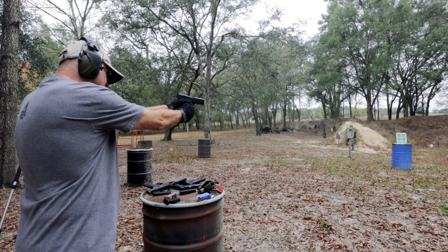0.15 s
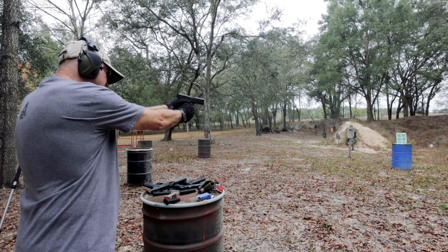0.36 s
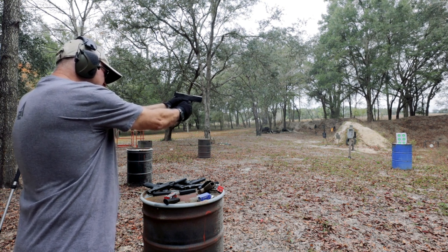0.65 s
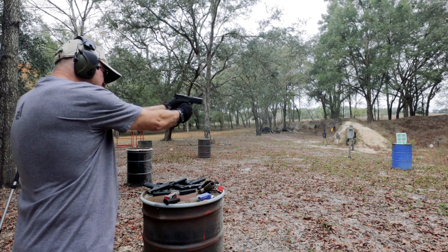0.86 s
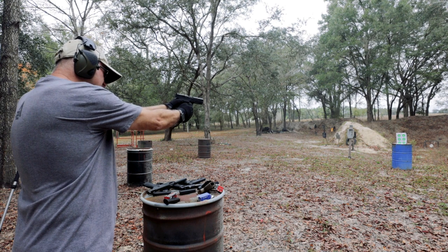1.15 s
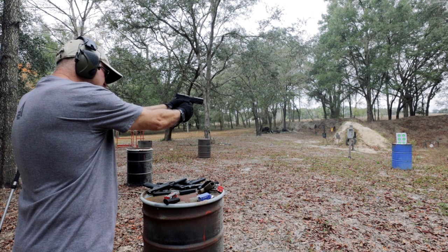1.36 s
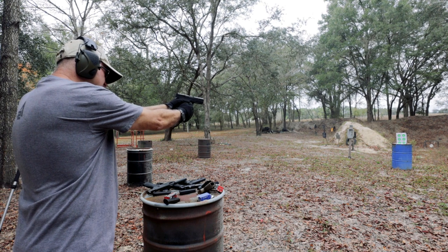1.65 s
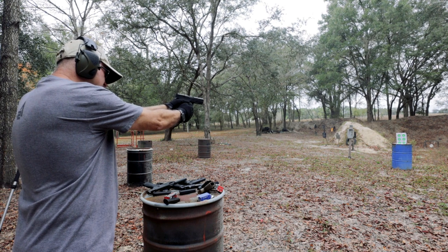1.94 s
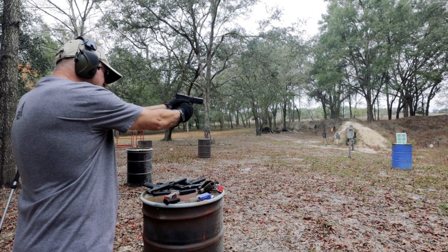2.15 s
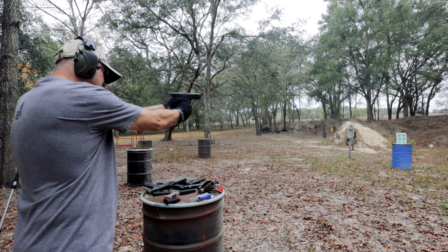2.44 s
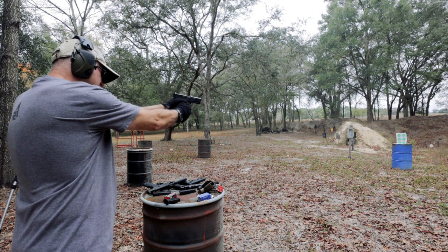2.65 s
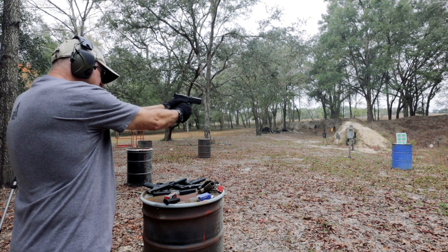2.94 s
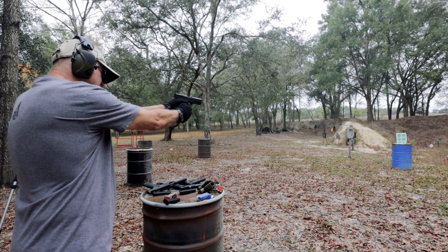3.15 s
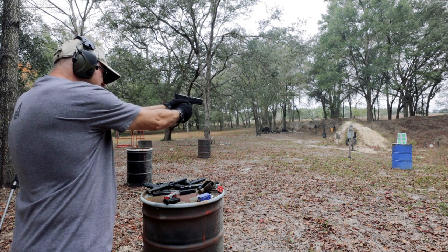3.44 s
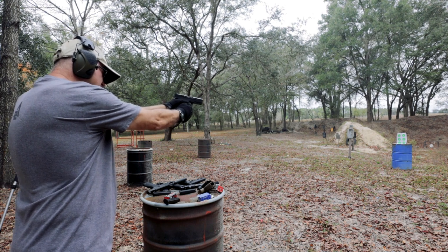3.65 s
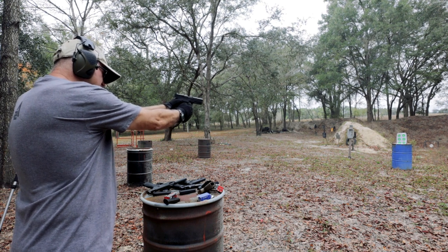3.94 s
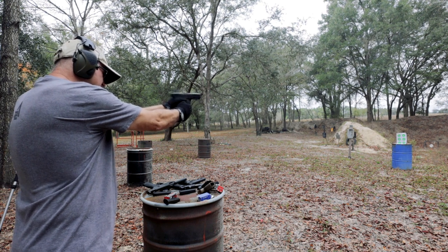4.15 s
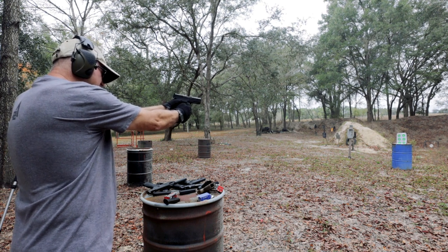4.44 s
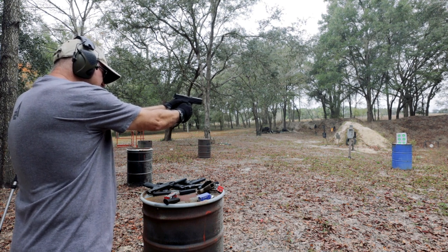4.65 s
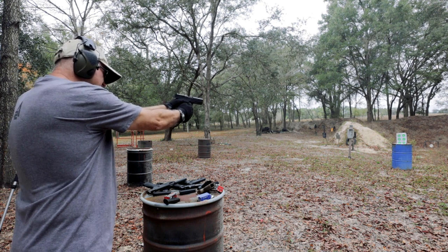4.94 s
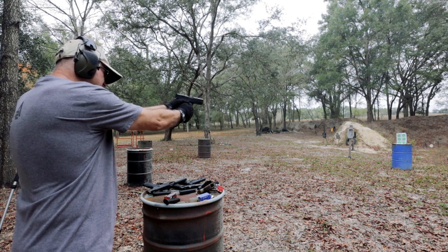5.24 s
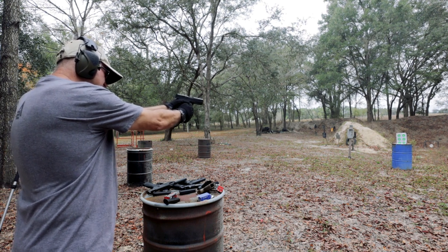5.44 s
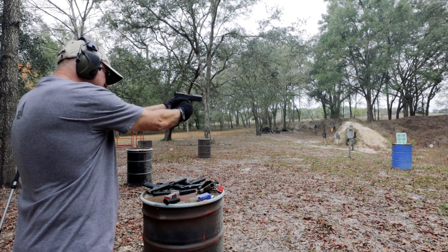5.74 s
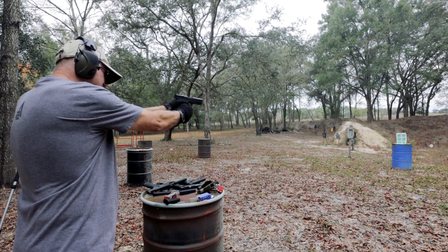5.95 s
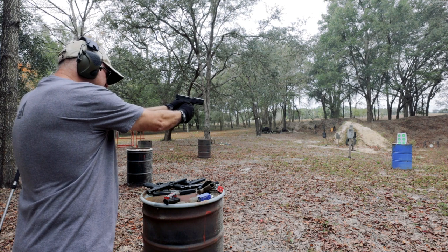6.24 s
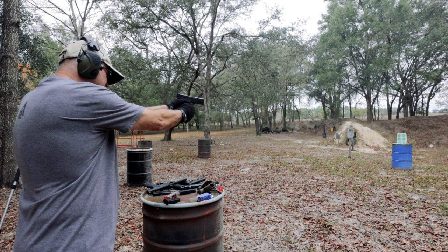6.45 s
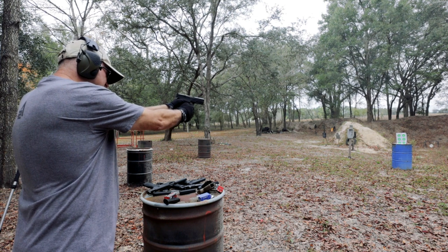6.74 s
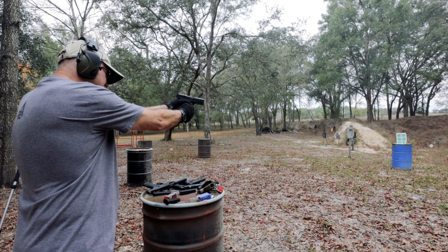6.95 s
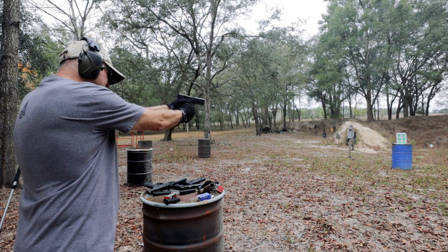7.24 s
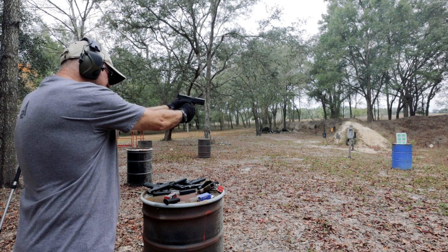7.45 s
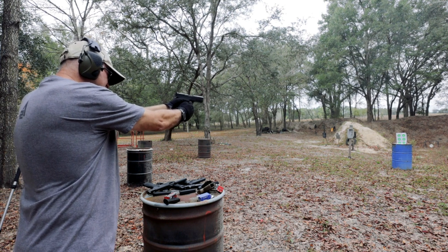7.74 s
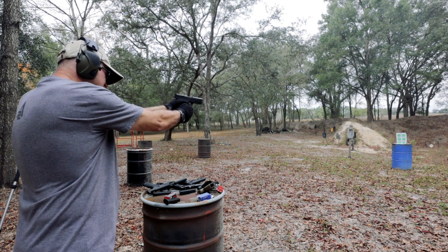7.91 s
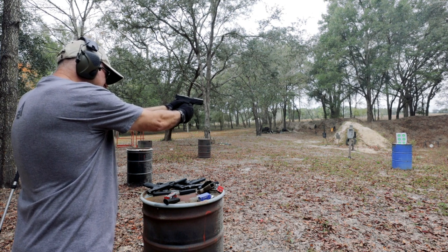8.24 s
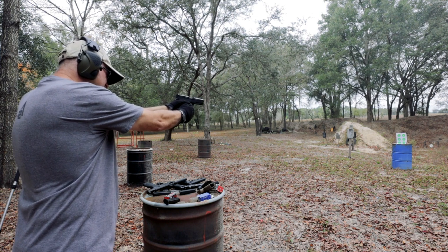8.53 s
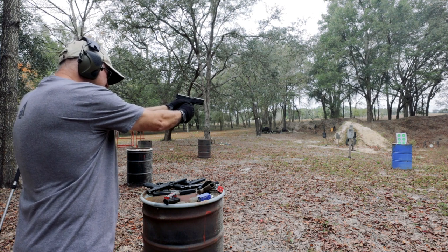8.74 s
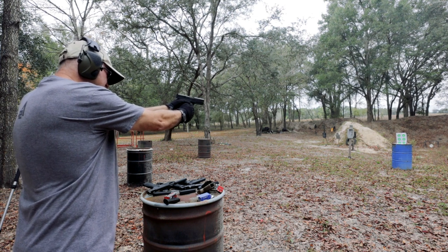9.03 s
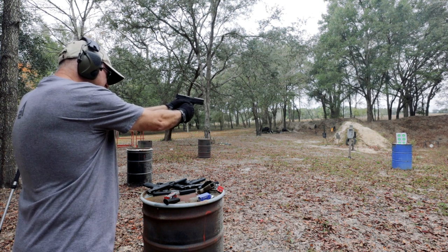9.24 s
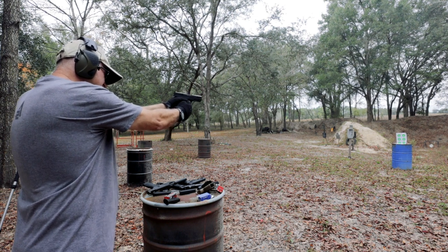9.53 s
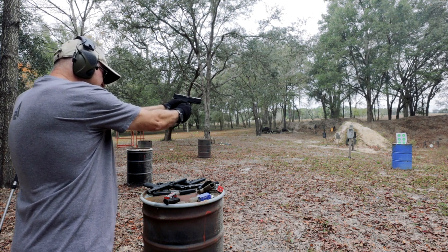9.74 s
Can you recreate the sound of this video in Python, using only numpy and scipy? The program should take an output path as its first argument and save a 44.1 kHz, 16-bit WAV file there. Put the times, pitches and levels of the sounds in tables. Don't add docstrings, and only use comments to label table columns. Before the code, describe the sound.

Outdoors among trees, a handgun close to the microphone fires six separate shots, nearly two seconds apart. Each is a hard, clipped crack with a brief low punch, then a fluttering echo from trunks and an earth bank that swells and dulls over about a second. A small bright slap returns as each bullet hits. Between shots come faint cloth rustle, leaf ticks and a quiet distant hum.

```python
import sys
import numpy as np
from scipy import signal
from scipy.io import wavfile
from scipy.ndimage import uniform_filter1d

SR = 44100
rng = np.random.default_rng(int(sys.argv[2]) if len(sys.argv) > 2 else 0)


def boost(x):
    u = np.asarray(x, float) / 20
    return 10 ** u


def unload_wav(signal):
    wavfile.write(
        sys.argv[1],
        SR,
        np.round(np.clip(np.atleast_2d(signal).T, -1, 1) * 32767).astype(np.int16),
    )


N = 435263


def unit(x):
    return x / np.sqrt(np.mean(x ** 2) + 1e-20)


def along(points, hz):
    f, v = np.transpose(points)
    return np.interp(np.log(hz + 1), np.log(f + 1), v)


def curves(rows):
    s, *cols = np.transpose(rows)
    return [np.interp(np.arange(N) / SR, s, c) for c in cols]


def shaped(x, gain_db, size=512):
    hz, t, z = signal.stft(x, SR, nperseg=size)
    z = z * boost(gain_db(hz[:, None], t))
    return signal.istft(z, SR, nperseg=size)[1][..., :len(x)]


def hiss(spectrum, patchy_db):
    def gain_db(hz, t):
        patches = rng.standard_normal((len(hz), len(t)))
        patches = uniform_filter1d(uniform_filter1d(patches, 12, 0), 4, 1)
        return along(spectrum, hz) + patchy_db * unit(patches)
    return unit(shaped(rng.standard_normal(N), gain_db, size=1024))


def add(track, s, x):
    part = track[round(s * SR):][:len(x)]
    part += x[:len(part)]


# t/s, peak level/dB, echo level/dB, echo brightness/dB
SHOTS = [
    (.6281, 4, 0, 0.5),
    (2.523, 3.5, 0.5, -0.5),
    (4.2306, 3, 0, 0),
    (5.7933, 3, -1.5, 0.5),
    (7.7862, 3.5, 0, 0.5),
    (9.528, 3.5, -0.5, 0.5),
]
# f/Hz, share
REPEATED_SHARE = [(300, .98), (1000, .9), (2000, .55), (4000, .2), (10000, .05)]


def shots():
    out, gas_habit = np.zeros(N), rng.standard_normal(SR // 8)
    early = trunks() + rows()
    early = np.pad(early, (0, 2 * SR - len(early)))
    fixed_answer = early + woods(lambda hz: along(REPEATED_SHARE, hz))
    for s, db, echo_db, bright_db in SHOTS:
        fresh_answer = woods(lambda hz: 1 - along(REPEATED_SHARE, hz))
        add(out, s - .0028, strike())
        add(out, s, boost(db - 5) * blast(gas_habit))
        add(out, s, boost(echo_db) * fixed_answer)
        add(out, s, boost(echo_db + bright_db) * fresh_answer)
    return out


def strike():
    clack = signal.lfilter(*signal.butter(1, [1500, 6000], "band", fs=SR), rng.standard_normal(140))
    return .07 * clack


# f/Hz, level/dB (per Hz)
BLAST_COLOUR = [(30, -32), (120, -19), (350, 2), (900, -6), (1500, -7.5), (2200, 3.5), (4000, -3),
                (6000, -0.5), (8400, 2), (11000, -2.5), (15000, -4.5)]
# f/Hz, t60/s
BLAST_T60 = [(100, 0.097), (400, 0.09), (1000, 0.04), (2500, 0.025), (6000, .015), (12000, 0.0067)]


def blast(habit):
    t = np.arange(len(habit)) / SR
    linger_db, linger_t60_s = -22, .05

    def gas_db(hz, s):
        tearing_db = -60 * s / along(BLAST_T60, hz)
        lingering_db = linger_db - 60 * s / linger_t60_s
        return along(BLAST_COLOUR, hz) + np.maximum(tearing_db, lingering_db)
    gas = shaped(habit + 1.05 * rng.standard_normal(len(t)), gas_db, size=64)
    push = 2.4 * boost(-60 * t / .055)
    drive = boost(25.5) * gas + push
    flat = drive / (1 + np.abs(drive) ** 6) ** (1 / 6)
    sag_db = np.where(flat > 0, -6, -3) * np.minimum(t / .011, 1.6)
    return flat * boost(sag_db) * np.minimum(t / 0.00038, 1)


# t/s after the shot, level/dB
TRUNKS = [(0.0264, -14), (0.03, -7), (0.0384, -18), (0.0432, -11.5), (0.049, -14.5), (0.0627, -11.5),
          (0.0727, -19), (0.0828, -13), (0.0993, -17), (0.111, -7), (0.1383, -21.5), (0.166, -14),
          (0.1702, -13.5), (0.1887, -8.5), (0.1999, -5.5), (0.211, -13), (0.2238, -11.5), (0.233, -15.5),
          (0.2685, -9.5), (0.2793, -17.5), (0.3033, -20.5), (0.3083, -16.5), (0.3235, -14)]


def trunks():
    t, out = np.arange(400) / SR, np.zeros(SR)
    for s, db in TRUNKS:
        u = t / (.00018 + .0006 * s)
        rise_s = (.00001 * np.exp(s / .025)).clip(0, .00012)
        edge = 1 - np.exp(-t / rise_s)
        add(out, s, -boost(db + 11.5) * edge * (1 - u) * np.exp(-u))
    return signal.lfilter(*signal.butter(2, 300, "high", fs=SR), out)


# t/s after the shot, f/Hz, level/dB, half length/s
ROWS = [(0.113, 732, -30, 0.0084), (.12, 466, -14, 0.0044), (0.17, 540, -19, 0.003),
        (.19, 826, -16.5, 0.0057), (0.203, 610, -20.5, 0.0071), (0.203, 340, -23, 0.01),
        (0.231, 580, -38, 0.0017), (0.248, 714, -20.5, 0.0048), (0.306, 580, -43, 0.0063),
        (0.351, 806, -19, .005), (0.386, 510, -21.5, 0.0046), (0.344, 111.6, -33.5, 0.0056),
        (.215, 143.6, -33, 0.011), (0.408, 107, -44, 0.0086), (0.446, 127, -45.5, .01),
        (0.497, 160, -46.5, 0.011), (.57, 166.5, -50, .02)]


def rows():
    t, out = np.arange(SR) / SR, np.zeros(SR)
    for s, hz, db, half in ROWS:
        swell = np.exp(-.5 * ((t - s) / half) ** 2)
        out += boost(db) * swell * np.sin(2 * np.pi * hz * (t - s))
    return out


def scatterers(count, spiky_db):
    clump_db, clump_s = 1.29, 0.0055
    clumps = unit(uniform_filter1d(rng.standard_normal(count), round(clump_s * SR)))
    size_db = spiky_db * rng.standard_normal(count) + clump_db * clumps
    return unit(rng.standard_normal(count) * boost(size_db))


# f/Hz, level/dB (per Hz)
WOODS_COLOUR = [(30, -48.5), (60, -32), (110, -12), (200, -11), (320, -8), (520, -1), (760, -0.5),
                (1100, -4), (1450, -10), (2400, -10.5), (5000, -15), (8000, -17.5), (13500, -27.5),
                (15700, -36.5)]
# t/s after the shot, level/dB
DEPTH = [(.02, -3), (.06, -8), (.13, -2.5), (.2, 2), (.36, -4), (.55, -17), (1.1, -31), (1.5, -44.5),
         (1.9, -50)]
# f/Hz, loss/(dB per s)
SOAK = [(130, 6), (400, 2.5), (750, 1), (2400, 1.5), (5000, 13.5), (8000, 25.5)]
# t/s after the shot, register f/Hz, level/dB, half length/s
STANDS = [(.03, 11000, -4, .012), (.022, 1000, -5, .008), (.042, 200, 6, .014), (.075, 330, 5, .012),
          (0.073, 2406, 4, .012), (.095, 600, -3, .009), (.113, 200, 7.5, .012), (.113, 3000, 5, 0.0097),
          (.11, 110, -9, .045), (0.136, 330, 7, .014), (.16, 5995, 4.5, .03), (0.166, 750, -5, 0.0098),
          (0.184, 2400, 5.5, 0.01), (.19, 105, 10, .02), (.215, 850, 3, .012), (0.241, 2330, 3, 0.01),
          (.26, 260, -6, .025), (0.323, 494, 3, 0.035), (.58, 1810, 1.5, .08), (.6, 11000, 3, .1),
          (.75, 110, 6, 0.073), (1.298, 250, 6.5, .1)]
# f/Hz, level/dB
LEAVES = [(3000, -0.05), (5000, 1.5), (8000, 5.5), (13500, 10.5)]


def woods(share):
    soak_ends_s = 0.79
    stand_octaves, leaves_s = .8, .6

    def colour_db(hz, t):
        return along(WOODS_COLOUR, hz) + 10 * np.log10(share(hz))

    def gain_db(hz, t):
        depth_db = np.interp(t, *np.transpose(DEPTH)) - along(SOAK, hz) * np.minimum(t, soak_ends_s)
        near_db = (20 * np.exp(-t / .25) - 8) / (1 + (hz / 250) ** 2)
        s, centre_hz, db, half = np.transpose(STANDS)
        register = np.exp(-.5 * (np.log2((hz + 60) / centre_hz) / stand_octaves) ** 2)
        swell = np.exp(-.5 * ((t - s[:, None]) / half[:, None]) ** 2)
        stands_db = register @ (db[:, None] * swell)
        air_db = -6 * t * np.maximum(hz / 1000 - 7.5, 0)
        bass_db = -18 * np.exp(-t / 0.23) * (hz < 140)
        leaves_db = along(LEAVES, hz) * np.exp(-t / leaves_s)
        return depth_db + leaves_db + near_db + stands_db + air_db + bass_db
    trees = scatterers(2 * SR, spiky_db=4.5)
    coloured = shaped(trees, colour_db, size=4096)
    onset = np.clip(np.arange(2 * SR) / SR / 0.0029, 0, 1) ** 2
    return boost(-5) * shaped(coloured, gain_db) * onset


# t/s, peak level/dB
IMPACTS = [
    (0.812, -7),
    (2.6718, -6.5),
    (4.364, -6),
    (5.9706, -10.5),
    (7.9366, -6),
    (9.678, -9.5),
]


def impacts():
    out, t = np.zeros(N), np.arange(300) / SR
    pulse = (t / 0.0017) * np.exp(1 - t / 0.00027)
    for s, db in IMPACTS:
        noise = rng.standard_normal(len(t))
        add(out, s, boost(db - 8) * np.diff(noise, prepend=0) * pulse)
    return signal.lfilter(*signal.butter(2, 9000, fs=SR), out)


# t/s, cloth level/dB, fizz over cloth level/dB, time to fade 10 dB/s
MOVES = [(.11, -57.5, -6, .12), (.22, -61, -8, 0.15), (.382, -57, -4, 0.13), (.47, -51, -9, .065),
         (.596, -63, -5.5, 0.15), (1.33, -58, -10, .06), (1.494, -52.5, -4, 0.16), (1.669, -61, -9, 0.03),
         (1.83, -67, -3, 0.1), (1.94, -69, -1, .07), (2.227, -60, -5, 0.15), (2.37, -65, -3, 0.1),
         (2.477, -54, -8, .02), (3.36, -67.5, -7.5, 0.3), (3.704, -65, -5, 0.1), (3.87, -70, -4.5, 0.16),
         (4.97, -66, -2, 0.03), (5.08, -60.5, -4, .07), (5.28, -63.5, -6, 0.15), (5.46, -62, -5, .03),
         (5.58, -65.5, -5, 0), (5.706, -65, -3, 0.2), (5.769, -60, -4.5, 0.13), (6.45, -69.5, 4.5, .05),
         (6.712, -51, -3.5, 0.05), (6.987, -65.5, -9.5, 0.16), (7.326, -54.5, -15, 0.14),
         (7.74, -63.5, -3, 0.17), (8.91, -58, -9, 0.1), (9.0, -53.5, -4, 0.04)]


def effort():
    rise_share, rest_db = 0.51, -84
    t = np.arange(0, N + 64, 64) / SR
    s, db, fizz_db, fade = np.transpose(MOVES)[:, :, None]
    slope_s = np.where(t < s, rise_share * fade, fade)
    power = boost(db - 10 * np.abs(t - s) / slope_s) ** 2
    cloth = power.sum(0) + boost(rest_db) ** 2
    fizz = (power * boost(fizz_db) ** 2).sum(0) + boost(rest_db - 8) ** 2
    return [np.interp(np.arange(N) / SR, t, np.sqrt(p)) for p in (cloth, fizz)]


# f/Hz, level/dB (per Hz)
CLOTH_COLOUR = [(1800, -29.5), (3600, -12), (5000, -3), (7600, -3), (9500, -8), (12000, -28)]
# f/Hz, level/dB (per Hz)
FIZZ_COLOUR = [(7500, -28), (9500, -4.5), (12500, 1), (14500, -3), (16000, -16.5)]
# f/Hz, level/dB (per Hz)
SCUFF_COLOUR = [(350, -20), (900, -6), (1500, -3), (2500, 0.5), (6000, -7.5), (10000, -17.5)]
# t/s, level/dB, rise/s, t60/s
SCUFFS = [
    (7.322, -47, 0.009, 0.45),
    (8.9, -56, 0.047, 0.9),
    (.45, -60, 0.0082, 0.28),
]


def rustle():
    flutter_db, flutter_s = 1.3, .015
    cloth, fizz = effort()
    grain = unit(boost(2 * unit(uniform_filter1d(rng.standard_normal(N), 90))))
    flutter = unit(uniform_filter1d(rng.standard_normal(N), round(flutter_s * SR)))
    grain = unit(grain * boost(flutter_db * flutter))
    t = np.arange(N) / SR
    still = np.prod([(t < s) | (t > s + .6) for s, *_ in SHOTS], axis=0)
    moves = cloth * hiss(CLOTH_COLOUR, patchy_db=2) + fizz * hiss(FIZZ_COLOUR, patchy_db=2.5)
    scuffs = np.zeros(N)
    for s, db, rise, t60 in SCUFFS:
        scuffs += boost(db - 60 * (t - s).clip(0) / t60) * ((t - s) / rise).clip(0, 1)
    return grain * (uniform_filter1d(still * 1., 4000) * moves + scuffs * hiss(SCUFF_COLOUR, patchy_db=1))


# t/s, peak level/dB, f/Hz, crackle relative to the peak level/dB
TICKS = [(0.022, -44, 7570, -16), (0.0838, -46, 9400, -12), (.3416, -41.5, 12100, -13),
         (0.3703, -37, 9000, -15), (.3765, -33, 8700, -16), (.4529, -38, 7500, -14),
         (.5903, -39, 7000, -16), (1.295, -46, 6960, -14), (1.6641, -38, 9000, -6), (2.0657, -43, 6000, -5),
         (2.4705, -34, 5630, -16), (3.534, -27, 5350, -15), (3.9694, -56, 7330, -12),
         (4.0444, -61, 4030, -12), (5.444, -38, 4630, -11), (6.6344, -47, 4750, -11),
         (6.825, -37, 6650, -17), (6.9006, -34, 5000, -13), (7.0495, -53, 6910, -12),
         (7.1934, -46, 5470, -14), (7.2496, -42, 4140, -10.5), (7.4349, -42.5, 4500, -15),
         (7.667, -38.5, 6500, -13.5), (8.709, -54, 9000, -17), (9.307, -43.5, 5460, -9),
         (9.4194, -54.5, 5000, -11), (9.494, -48, 4000, -12)]


def ticks():
    spread_s, crackle_leads_s, crackle_t60_s = .012, 0.002, .06
    out, t, long = np.zeros(N), np.arange(200) / SR, np.arange(1800) / SR
    shape = (len(TICKS), len(long))
    grit = rng.standard_normal(shape) * boost(3 * rng.standard_normal(shape))
    grit = unit(signal.sosfilt(signal.butter(3, [3800, 14000], "band", fs=SR, output="sos"), grit))
    pulse = (t / .00013) * np.exp(1 - t / .00013)
    for (s, db, hz, crackle_db), noise in zip(TICKS, grit):
        crackle = boost(db + crackle_db - 60 * long / crackle_t60_s) * np.minimum(long / .002, 1) * noise
        add(out, s - crackle_leads_s, crackle)
        for k, (when, size, pitch) in enumerate(rng.uniform(size=(5, 3))):
            overtone = 0.55 * np.sin(2 * np.pi * (9000 + 5000 * pitch) * t)
            burst = (np.sin(2 * np.pi * hz * t) + overtone) * pulse
            companion = k > 0
            delay_s = 0.0018 + companion * spread_s * (when - .35)
            add(out, s + delay_s, boost(db - companion * (11.5 + 8 * size)) * burst)
    return out


# t/s, level/dB, f/Hz, t60/s
KNOCKS = [
    (1.76, -41.5, 2500, 0.018),
    (3.452, -42, 2700, .025),
    (3.655, -44, 2424, .025),
    (5.16, -42.5, 2600, .03),
    (5.365, -43, 2300, .02),
    (8.88, -39.5, 1298, 0.039),
    (3.91, -47.5, 172, 0.18),
    (5.4, -53.5, 160, .15),
    (6.93, -55, 170, 0.11),
]


def knocks():
    out, t = np.zeros(N), np.arange(SR // 5) / SR
    for s, db, hz, t60 in KNOCKS:
        onset = 1 - np.exp(-t * hz / 2)
        add(out, s, boost(db - 60 * t / t60) * np.sin(2 * np.pi * hz * t) * onset)
    return out


# t/s, far hum level/dB, rumble level/dB
AMBIENCE = [(0, -58, -65.5), (.6, -57.5, -62.5), (1.5, -61, -67.5), (4, -61.5, -67.5), (7, -62, -72.5),
            (9.87, -62.5, -65.5)]
# f/Hz, level/dB (per Hz)
FAR_COLOUR = [(120, -29), (200, -5), (327, -12), (744, -3), (815, -1), (1310, -6.5), (4130, -22.5),
              (8120, -32.5), (15700, -29)]
# f/Hz, level/dB (per Hz)
RUMBLE_COLOUR = [(15, -24), (30, -10), (60, -3), (100, -1), (160, -1.5), (220, -12.5), (400, -40)]
# f/Hz, level/dB
MACHINERY = [
    (152, -75.5),
    (240, -74),
    (550, -70.5),
    (752, -68.5),
]


def ambience():
    hum_db, rumble_db = curves(AMBIENCE)
    t, lines = np.arange(N) / SR, np.zeros(N)
    for hz, db in MACHINERY:
        drift = np.cumsum(rng.standard_normal(N)) * .022
        lines += boost(db) * np.sin(2 * np.pi * hz * t + drift)
    far = boost(hum_db) * hiss(FAR_COLOUR, patchy_db=.7)
    return far + lines + boost(rumble_db) * hiss(RUMBLE_COLOUR, patchy_db=-0.5)


def scene():
    return (shots() + impacts() + rustle() + ticks() + knocks() + ambience())[None]


def roll_off(x):
    return signal.sosfilt(signal.butter(12, 15810, fs=SR, output="sos"), x)


def record(dry):
    x = signal.sosfilt(signal.butter(2, 35, "high", fs=SR, output="sos"), dry)
    x = np.clip(x, -1, 1)
    x = signal.sosfiltfilt(signal.butter(10, 15750, fs=SR, output="sos"), x)
    return roll_off(x)


dry = scene()
out = record(dry)
unload_wav(out)
```